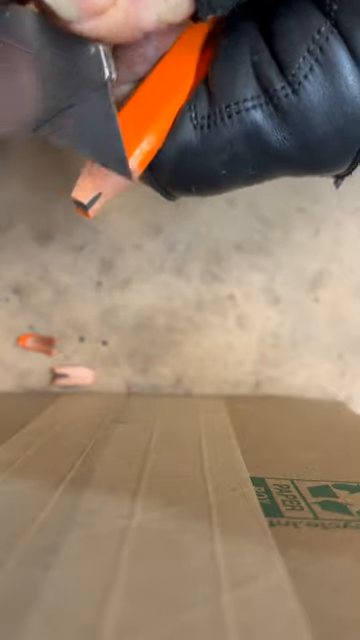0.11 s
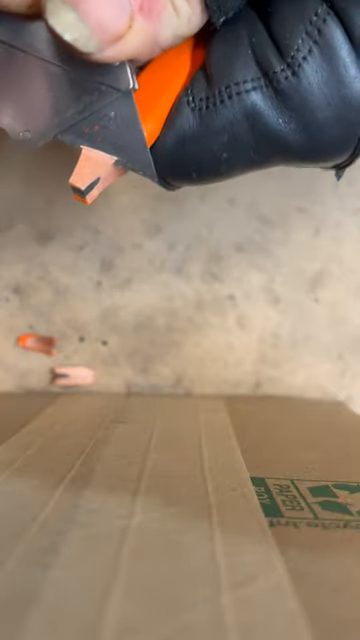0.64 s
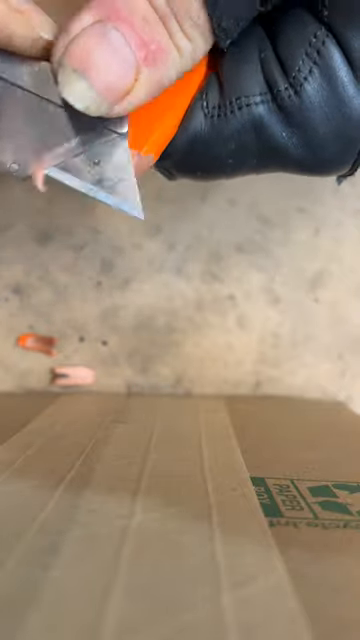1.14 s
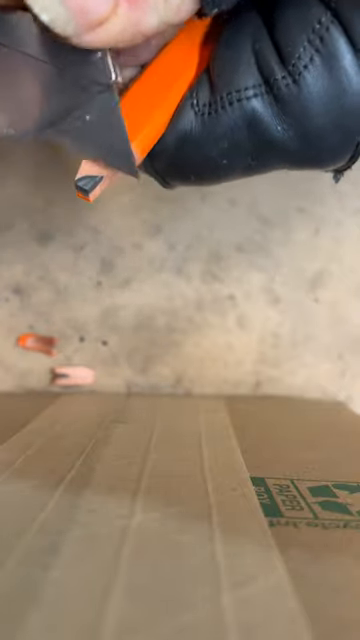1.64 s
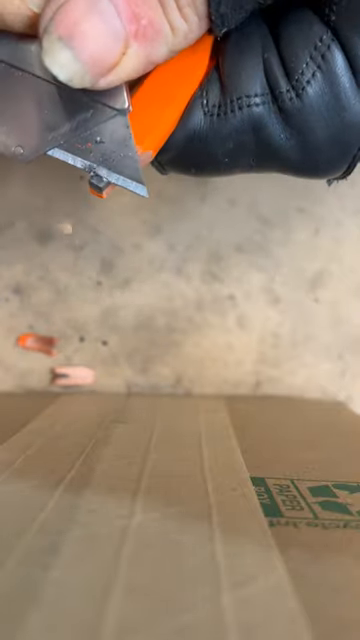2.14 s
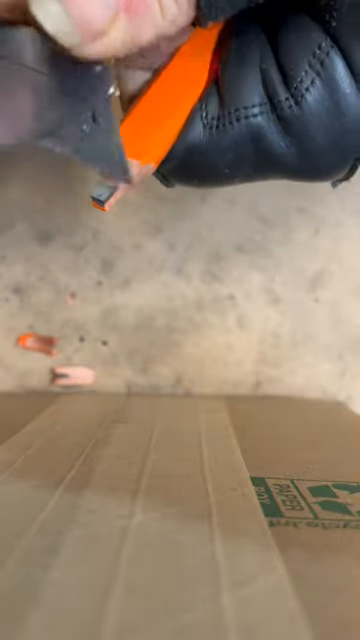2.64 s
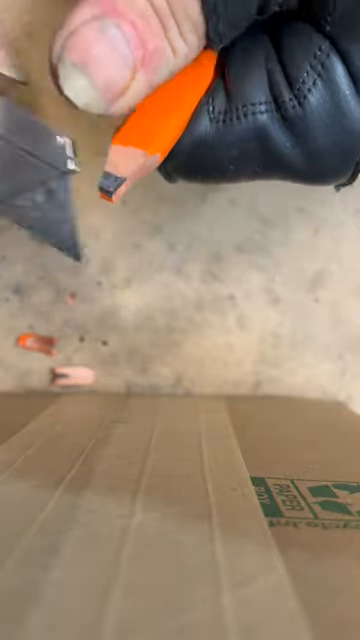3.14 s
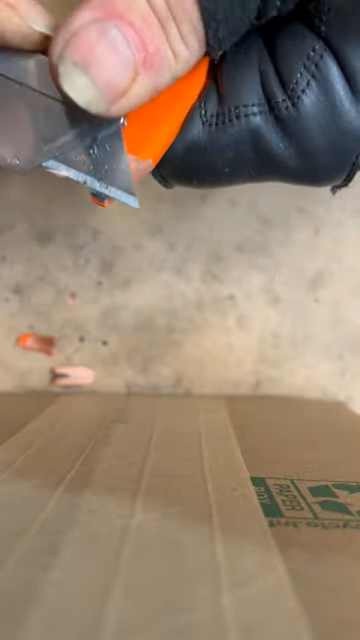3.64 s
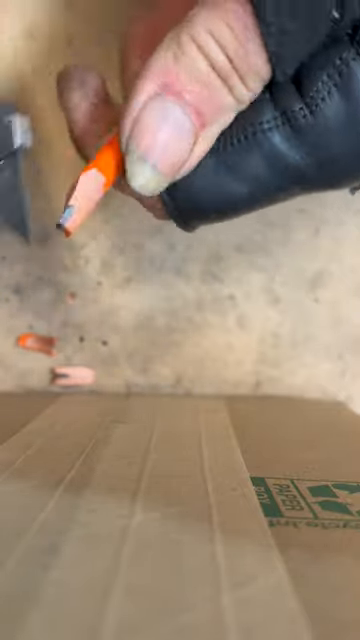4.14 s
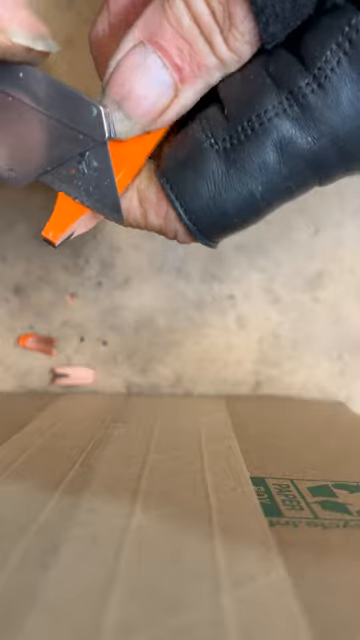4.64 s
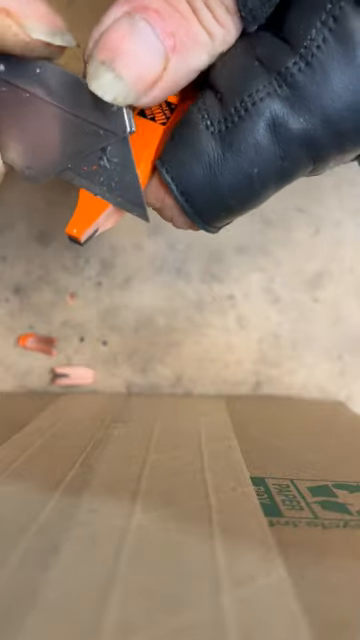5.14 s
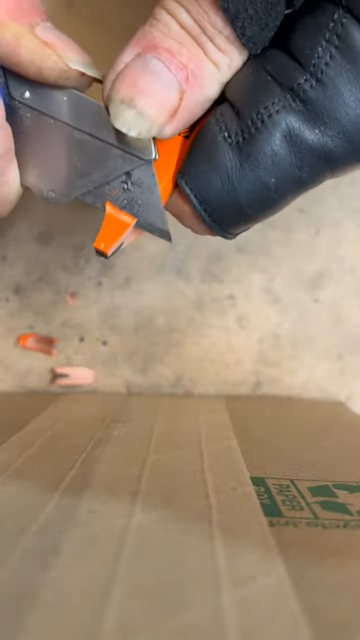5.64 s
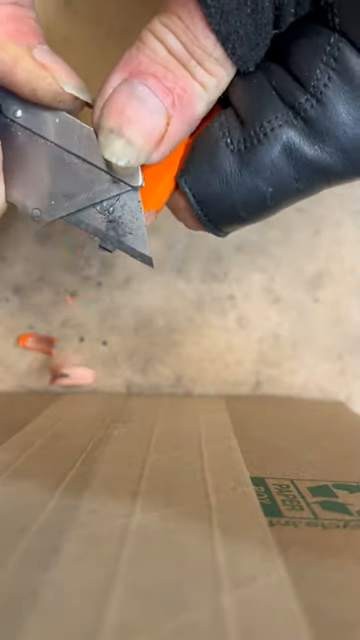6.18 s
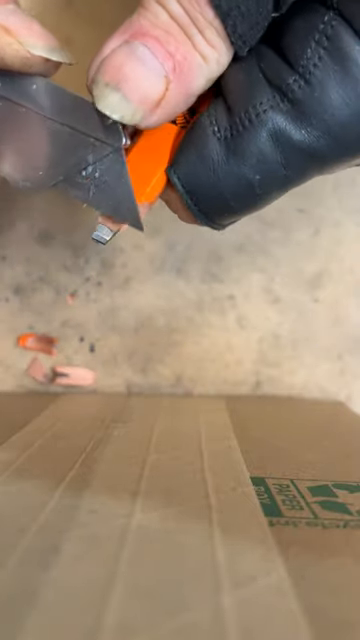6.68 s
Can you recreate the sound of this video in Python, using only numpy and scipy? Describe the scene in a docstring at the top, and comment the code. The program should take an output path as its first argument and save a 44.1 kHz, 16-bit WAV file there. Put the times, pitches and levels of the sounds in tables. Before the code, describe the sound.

A blade shaves a wooden pencil very close to the microphone, in a small quiet room with a very short reflection. From 0 s small dry ticks and fibre cracks come irregularly, with a firmer knock at 0.9 and a sharp cluster at 1.23. Faint rubbing follows until a hard snap at 2.17, more cracks, and another strong one at 2.46. Near 3 s the rubbing thins; a short light scrape comes at 3.1. At about 3.77 a stronger rasping scrape and snap stand out. From 4 to 4.7 only soft scraping remains. Clicks return at 4.76 and 4.96, then small brittle ticks around 5.5. Bright snaps crowd together at 5.9-6.0, with loud cracks at 6.18 and 6.35, some carrying soft low thumps. The last moments fade to light rubbing. A low, soft rumble and faint wavering hum continue throughout.

```python
"""A blade shaves a flat wooden pencil held close to a phone in a quiet workshop.
From the start fibres snap in short bursts that ring blade and pencil, hardest past one and two seconds.
The rubbing of edge and glove thins out near three seconds, then one strong scrape stands out before four.
After a lull of soft scraping the snaps return, crowding together near six seconds; some cuts jolt the hand.
Throughout, a small room answers briefly over a low rumble with a wavering hum, both made of filtered noise."""
import sys
import numpy as np
from scipy import signal
from scipy.fft import rfft, irfft, next_fast_len
from scipy.io import wavfile
from scipy.ndimage import uniform_filter1d

SR = 44100
rng = np.random.default_rng(int(sys.argv[2]) if len(sys.argv) > 2 else 0)


def inscribe(sig):
    """Save sig as 16-bit PCM at rate SR to the path in sys.argv[1].

    A 1-D sig is mono; a 2-D sig holds one channel per row.
    Samples are clipped to [-1, 1] before scaling.
    """
    pcm = np.round(np.clip(np.atleast_2d(sig).T, -1, 1) * 32767)
    wavfile.write(sys.argv[1], SR, pcm.astype(np.int16))


def volts_from_db(level):
    """Convert decibel levels to linear amplitude ratios."""
    exponent = np.asarray(level, float) / 20
    return 10 ** exponent


N = 299439  # length in samples

# resonances of blade and pencil: pitch_hz, width_hz, level_db
RESONANCES = [(302, 730, -13), (1095, 497, 2.5), (1640, 278, 5), (2125, 590, -2), (2964, 580, -7),
              (3325, 630, -7), (5014, 1070, -2.5), (5960, 1390, -2.5), (7300, 1320, -1.5),
              (9260, 1920, -7.5), (10830, 1800, -11), (14700, 3100, -19.5)]
WOODY_HZ, BRIGHT_HZ = 1231, 6910  # edges between the woody, middle and bright parts


def along(points, hz):
    """Gain at the frequencies hz, drawn through (Hz, dB) points on a log pitch axis."""
    p = np.array(points, float)
    return volts_from_db(np.interp(np.log(hz + 1), np.log(p[:, 0]), p[:, 1]))


def unit(x):
    """Scale to rms 1."""
    return x / np.sqrt(np.mean(x ** 2))


def shaped(x, gain):
    """Filter by a gain given as a function of frequency."""
    n = next_fast_len(x.shape[-1])
    spectrum = rfft(x, n) * gain(np.fft.rfftfreq(n, 1 / SR))
    return irfft(spectrum, n)[..., :x.shape[-1]]


def walk(rate):
    """Random control curve of rms 1 that slews to a new level rate times a second."""
    hold = int(SR / rate)
    levels = rng.standard_normal(N // hold + 1)
    return unit(uniform_filter1d(np.repeat(levels, hold), hold)[:N])


def body(hz, scatter_db=np.zeros(len(RESONANCES))):
    """Blade and pencil as a sum of damped resonances; scatter_db changes how strongly each one speaks."""
    response = 0
    for k, (pitch_hz, width_hz, level_db) in enumerate(RESONANCES):
        damping = 1j * hz * width_hz
        mode = damping / (pitch_hz * pitch_hz - hz * hz + damping)
        response = response + (-1) ** k * volts_from_db(level_db + scatter_db[..., k, None]) * mode
    return response


def parts(hz):
    """Crossover filters for the woody, middle and bright parts of the spectrum."""
    woody = 1 / (1 + 1j * hz / WOODY_HZ) ** 2
    middle = (1j * hz / WOODY_HZ) ** 2 * woody / (1 + (hz / BRIGHT_HZ) ** 6)
    bright = (1j * hz / BRIGHT_HZ / (1 + 1j * hz / BRIGHT_HZ)) ** 3
    return woody, middle, bright


def snaps():
    """Each snap is a cluster of tiny fractures that swells and dies within milliseconds, ringing the body."""
    # fibres snapping and blade knocks: time_s, level_db (middle part, its energy held for 1 ms),
    # woody_db and bright_db (relative to level_db), half_length_ms (clipped below)
    snap_table = [(0.028, -33, -5, -4.5, 1.14), (0.143, -44, -4, -5.5, 1.3), (0.4065, -30, -10.5, -5, 0.64),
                  (0.5313, -39, -6, -4.5, 1.4), (0.652, -32, -3.5, -11, 0.99),
                  (0.673, -31, -6.5, -7.5, 0.47), (0.705, -46.5, -14, 4.5, 0.5), (0.722, -35, -5, -7, 0.89),
                  (0.7413, -28.5, -6.5, -13, 0.42), (0.7846, -30, 0.5, -13, 1.6),
                  (0.9212, -24, -0.5, -9, 0.58), (1.017, -49, -8, 4, 0.93), (1.0562, -40, -8, 3, 0.32),
                  (1.091, -37, -12, -5.5, 0.86), (1.2011, -34, -4.5, -9, 1.8),
                  (1.2343, -19, -8.5, -8, 1.54), (1.2395, -23, -7, -16, 1.4), (1.2442, -20, -9, -2.5, 0.91),
                  (1.4742, -45, -39, -19, 0.93), (1.6016, -42.5, -8, -8.5, 1.9),
                  (1.8981, -36.5, -4.5, -24, 0.36), (1.971, -45, -1, -18, 1.7), (2.006, -41.5, -5, 6, 0.62),
                  (2.016, -43.5, -3, 1, 1.2), (2.028, -39.5, -5.5, -9, 2), (2.101, -39.0, -10, -8.5, 1.4),
                  (2.144, -43, -1, -10, 1.4), (2.1746, -14.5, -8.5, -8, 1.6), (2.208, -25, -0.5, -9, 0.91),
                  (2.215, -25, -2.5, -17, 0.86), (2.241, -25, 0.5, -10, 0.78),
                  (2.316, -24, -8.5, -14, 0.91), (2.326, -29.5, -0.5, -16, 1.3),
                  (2.418, -32.5, -1.5, -11, 0.65), (2.4355, -43, 8.5, -9, 0.53),
                  (2.4639, -15.5, -4.5, -12.5, 1.5), (2.5503, -35, -4, -14, 0.57),
                  (2.6729, -48, -1, -2.5, 0.54), (2.939, -49, 4.5, -21, 0.95),
                  (2.973, -33.5, -4, -31, 0.38), (3.0925, -33, -7, -10, 1.9), (3.237, -27, -3, -15, 0.95),
                  (3.253, -41, 1.5, -7, 0.98), (3.282, -41.5, -14, -6.5, 1.1),
                  (3.553, -44.5, -15, -25, 0.5), (3.629, -44.5, 4.5, -15, 5.9),
                  (3.7016, -37.5, -2, -8, 2.6), (3.7648, -21.5, -9.5, -9, 2.3), (3.831, -32, 0, -16, 1.7),
                  (3.8439, -28.5, -6.5, -12.5, 1.5), (4.0068, -47.0, -6, -10, 1.2),
                  (4.763, -30.5, -7, -8.5, 1.14), (4.92, -43, -10, 3, 0.31), (4.933, -33.5, -6, 2, 0.32),
                  (4.957, -26, -5.5, -0.5, 0.33), (4.965, -31, -4, -1.5, 1.2), (5.267, -54, -3, 6.5, 0.61),
                  (5.3086, -51, -1.5, 3.5, 0.42), (5.4572, -32.5, -25, -2, 0.44),
                  (5.4731, -42, -1, -8, 1.7), (5.53, -35, -10, -10, 1.1), (5.5378, -30.5, -6, -2, 0.44),
                  (5.5503, -31, -10.5, -3, 0.29), (5.5886, -41.5, -4, 3.5, 2.8), (5.616, -47, -4, 3, 1.4),
                  (5.718, -41.5, -9, -4, 2), (5.814, -24.5, -8, -8.5, 1.03), (5.8497, -35.5, -3, -9, 2.2),
                  (5.87, -34.5, -10, -1, 2.6), (5.9064, -36.5, -29, 8, 0.57), (5.911, -23, -6, 0, 1.07),
                  (5.929, -28.5, -3, -5, 1.7), (5.948, -15.5, -10.5, 2.5, 0.97),
                  (5.965, -19.5, -8.5, -11, 0.75), (5.9778, -27.5, -7.5, -3, 1.2),
                  (6.1425, -40.5, -15, -4.5, 1.4), (6.149, -38, -11, -10.5, 0.54),
                  (6.16, -20.5, -7.5, -4, 0.8), (6.1831, -14, -7, -3.5, 0.59), (6.27, -28.5, -8, -9, 0.9),
                  (6.3539, -12, -7, -7, 1.05), (6.364, -24, 2, -19, 1.4), (6.407, -39, -4, -7, 1.1),
                  (6.4226, -44.5, -13, 4, 0.7), (6.5543, -59.5, -8, 0.5, 0.69)]
    time_s, level_db, woody_db, bright_db, half_ms = np.transpose(snap_table)[..., None]
    lead, length = 700, 2048  # samples ahead of the snap time, and in all
    ms = 1000 * (np.arange(length) - lead) / SR
    hz = np.fft.rfftfreq(length, 1 / SR)
    chance = rng.standard_normal((len(snap_table), 2 * length + len(RESONANCES)))
    fine, coarse, grip = np.split(chance, [length, 2 * length], axis=1)

    # fractures come in uneven lumps under a millisecond long
    lumps = volts_from_db(3 * unit(uniform_filter1d(coarse, size=24)))
    u = ms / np.clip(half_ms, .3, 4) + 0.83
    # a faint tearing builds up before the break
    onset = np.exp(-u ** 2 / 2.56) + volts_from_db(-14.5) * np.exp(ms / 2.6)
    shape = np.where(u < 0, onset, 1 / np.cosh(0.56 * u))

    # bending waves in pencil and hand: the lowest pitches come nearly this many of their cycles late,
    # higher pitches fewer
    bending_cycles = 1.775
    bending = np.exp(-2j * np.pi * bending_cycles * np.log(hz / (hz + WOODY_HZ) + 1e-9))
    # the grip changes how strongly each resonance speaks
    ring = rfft(fine * lumps * shape) * body(hz, 1.8 * grip) * bending

    woody, middle, bright = (irfft(ring * part) for part in parts(hz))
    # give each part the energy of rms 1 held for 1 ms
    woody, middle, bright = (v * np.sqrt(SR / 1000 / (v ** 2).sum(1, keepdims=True))
                             for v in (woody, middle, bright))
    bursts = volts_from_db(level_db) * (middle + volts_from_db(woody_db) * woody + volts_from_db(bright_db) * bright)

    out = np.zeros(N + length)
    for start, burst in zip((time_s[:, 0] * SR).astype(int) - lead, bursts):
        out[start:start + length] += burst
    return out[:N]


def pressure():
    """Gains of the rubbing's middle, woody and bright parts: scrapes of one shape over the sliding grip."""
    # the edge biting into the wood: deepest_bite_s, fade_s (time to fall 10 dB), level_db (middle part),
    # woody_db and bright_db (relative to level_db)
    scrape_table = [(0.56, 0.09, -56, -10, -5), (0.78, 0.04, -54, -7, -2), (1.068, 0.07, -62, -8, -5),
                    (1.279, 0.12, -61.5, -10, -10), (1.935, 0.01, -50.5, -3, -18),
                    (2.03, 0.21, -57, -9, -6.5), (3.07, 0.05, -51.5, -7, -15),
                    (3.111, 0.02, -37.5, -11, -11.5), (3.175, 0.08, -47, -6.5, -14),
                    (3.665, 0.11, -54, -4.5, -13.5), (3.748, 0.0377, -46, -8, -6),
                    (3.774, 0.02, -26.5, -7, -9.5), (3.863, 0.0374, -47, -10, -8.5),
                    (4.1, 0.15, -59.5, -12, -10), (4.36, 0.2, -58.5, -11.5, -7),
                    (4.945, 0.01, -52.5, -9, -7.5), (5.585, 0.05, -60.5, -3, 2),
                    (5.723, 0.03, -53.5, -6.5, -5), (5.84, 0.07, -54, -7, 3), (6.386, 0.07, -52, -13, -8)]
    # glove and fingers sliding on the pencil: time_s, level_db (middle part)
    grip_table = [(0, -66), (.4, -76.5), (1.15, -76), (1.4, -67), (1.8, -69), (2.2, -66.5), (2.6, -68),
                  (2.88, -83), (3.4, -91), (3.98, -77), (4.2, -74), (4.88, -66.5), (5.2, -68),
                  (6.05, -67.5), (6.12, -85.5), (6.24, -82), (6.5, -70.5), (6.79, -73.5)]
    grip_parts_db = np.array([[0], [-10.5], [-11.5]])  # middle, woody, bright
    rise_share, bite_power = 0.66, 1.16  # rise time as a share of the fade; roundness of the top

    t = np.arange(N) / SR
    power = volts_from_db(np.interp(t, *np.transpose(grip_table)) + grip_parts_db) ** 2
    for bite_s, fade_s, level_db, woody_db, bright_db in scrape_table:
        u = np.abs(t - bite_s) / (fade_s * np.where(t < bite_s, rise_share, 1))
        scrape_db = level_db - 10 * np.minimum(u, 30) ** bite_power
        power = power + volts_from_db(scrape_db + np.array([[0], [woody_db], [bright_db]])) ** 2
    return np.sqrt(power)


def rub():
    """Dense stick-slip with splinter ticks; each resonance swells on its own as the edge bites unevenly."""
    middle_gain, woody_gain, bright_gain = pressure()
    splinters_per_s, splinter_db = 280, 2.5  # stray ticks; rise for a tick of height 1
    strikes = (rng.random(N) < splinters_per_s / SR) * rng.exponential(size=N)
    # ticks last about 1 ms, with capped height
    ticks = np.minimum(uniform_filter1d(strikes, size=45) * 45, 2)
    slips_db = 2.0 * walk(300) + 1.0 * walk(40) + splinter_db * ticks
    slips = rng.standard_normal(N) * volts_from_db(slips_db)

    # each row silences all resonances but one
    alone_db = np.where(np.eye(len(RESONANCES)), 0, -200)
    rung = np.zeros(N)
    for mode_db in alone_db:
        swell = volts_from_db(2 * walk(35) + 1.3 * walk(7))
        rung += swell * shaped(slips, lambda hz: body(hz, mode_db))

    woody, middle, bright = (unit(shaped(rung, lambda hz: parts(hz)[k])) for k in range(3))
    # light slips do not shake the hand
    woody = shaped(woody, lambda hz: 1 / (1 + (330 / (hz + 1)) ** 4))
    return woody_gain * woody + middle_gain * middle + bright_gain * bright


def jolts():
    """The hand's jolt as a soft low thump: a quickly damped sine that sags in pitch."""
    # the blade breaks free or the grip shifts: start_s, level_db (before the envelope),
    # pitch_hz (where the sag ends)
    jolt_table = [(0.926, -46, 155), (1.245, -40, 81.5), (2.182, -38, 90), (2.469, -47, 145),
                  (4.967, -46.5, 113), (5.916, -40.5, 126), (5.951, -35.5, 121), (6.171, -40, 99.4),
                  (6.368, -37, 90)]
    out, t = np.zeros(N), np.arange(SR // 10) / SR
    envelope = t / 0.0095 * np.exp(1 - t / 0.0076)
    sagging_s = t + 0.0033 * (1 - np.exp(-t / 0.0037))  # time that runs fast at first
    for start_s, level_db, pitch_hz in jolt_table:
        thump = envelope * np.sin(2 * np.pi * pitch_hz * sagging_s)
        start = int(start_s * SR)
        out[start:start + len(t)] += volts_from_db(level_db) * thump
    return out


def room(x):
    """Nearby bench and walls: a short dense tail of decaying noise, different at each microphone."""
    t60_s, level_db = 0.11, -12.5
    t = np.arange(SR // 4) / SR
    decay = np.exp(-np.log(1000) * t / t60_s) * (t > .003)  # first echoes after 3 ms
    tail = rng.standard_normal((2, len(t))) * decay
    tail = signal.lfilter([1 - .3], [1, -.3], tail)  # soften the treble
    tail = tail / np.sqrt((tail ** 2).sum(1, keepdims=True))
    return volts_from_db(level_db) * signal.fftconvolve(x[None], tail, axes=1)[:, :N]


def air():
    """Room tone from noise, nearly mono in the bass, each octave of its mid swelling, with a wavering hum."""
    # room tone colour: pitch_hz, density_db (per Hz, relative)
    tone_table = [(15, -47), (33, 2), (89, -4), (416, -20), (840, -21), (1610, -27), (6050, -40),
                  (16000, -64.5)]
    # stereo width of the room tone: pitch_hz, side_minus_mid_db
    width_table = [(60, -24.5), (200, -12.5), (700, -1), (2400, -6), (15000, -7)]
    tone_db = -57
    hum_hz, hum_half_width_hz, hum_db = 90, 6.6, -68.5

    octaves = np.zeros(N)
    for centre_hz in 2. ** np.arange(5, 15):
        swell = volts_from_db(2.23 * walk(6))
        octaves += swell * shaped(rng.standard_normal(N),
                                  lambda hz: np.exp(-np.log2((hz + 1) / centre_hz) ** 2))
    mid = unit(shaped(octaves, lambda hz: along(tone_table, hz)))
    side = unit(shaped(rng.standard_normal(N), lambda hz: along(tone_table, hz)))
    side = shaped(side, lambda hz: along(width_table, hz))
    tone = volts_from_db(tone_db + 1.1 * walk(4.5)) * np.array([mid + side, mid - side])

    # noise this narrow is heard as a hum that wavers
    hum = unit(shaped(rng.standard_normal(N),
                      lambda hz: 1 / (1 + ((hz - hum_hz) / hum_half_width_hz) ** 2)))
    return tone + volts_from_db(hum_db) * hum


def scene():
    """The work is heard close by two spaced microphones, whose paths differ a little with pitch."""
    work = snaps() + rub() + jolts()
    side_points = [(100, -20.0), (500, -10.0), (2000, -28.5), (5000, -8.5), (12000, -15.0)]  # Hz, dB
    side_delay_s = 0.000365
    side = shaped(work, lambda hz: np.exp(-2j * np.pi * hz * side_delay_s) * along(side_points, hz))
    return np.array([work + side, work - side]) + room(work) + air()


def band_limit(x):
    """A steep low-pass at the top of the band."""
    return signal.sosfilt(signal.butter(12, 16990, fs=SR, output="sos"), x)


def record(dry):
    """The phone adds faint hiss, drops the deepest bass and nearly all of the very top."""
    hiss = volts_from_db(-93.5) * rng.standard_normal(dry.shape)
    bass_hz, top_hz, top_leak = 38, 15900, .04  # top_leak: gain left above the top edge

    def band(hz):
        """Steep top edge and a gentler bass cut."""
        top = 1 / (1 + (hz / top_hz) ** 80) + top_leak
        return top / np.sqrt(1 + (bass_hz / (hz + 1)) ** 6)

    mix = shaped(dry + hiss, band)
    return band_limit(mix)


dry = scene()
out = record(dry)
inscribe(out)
```